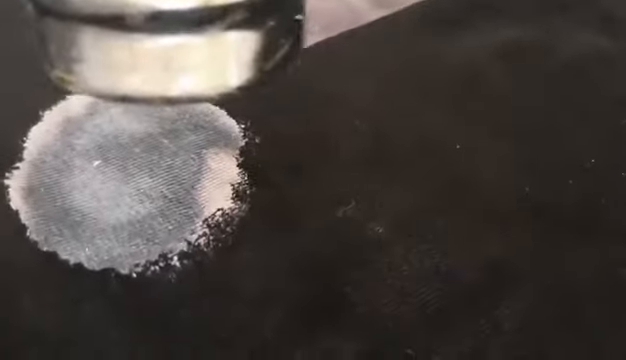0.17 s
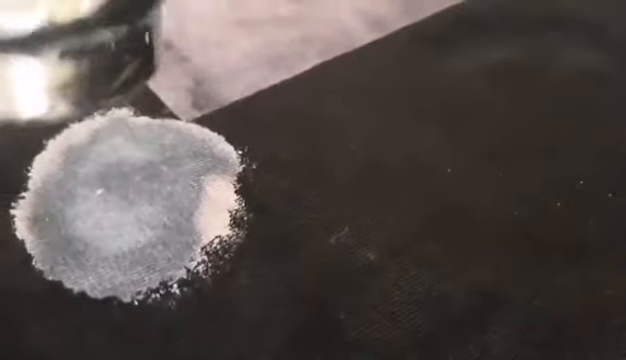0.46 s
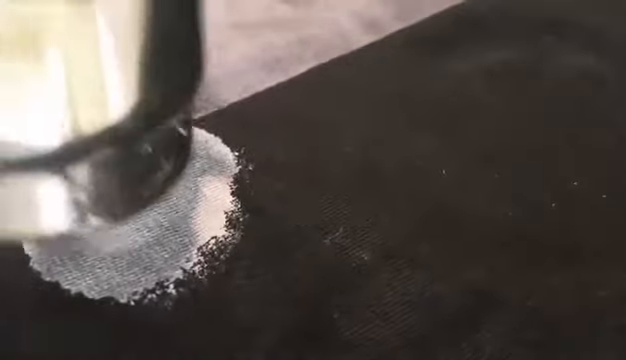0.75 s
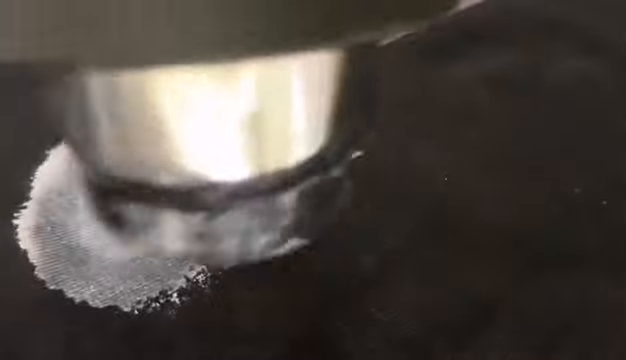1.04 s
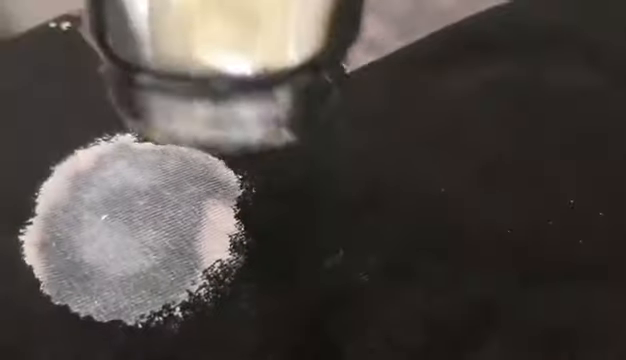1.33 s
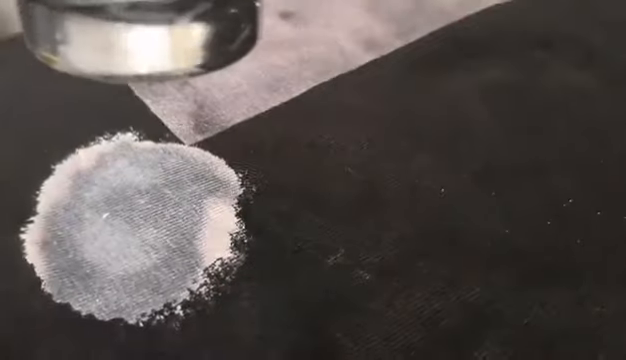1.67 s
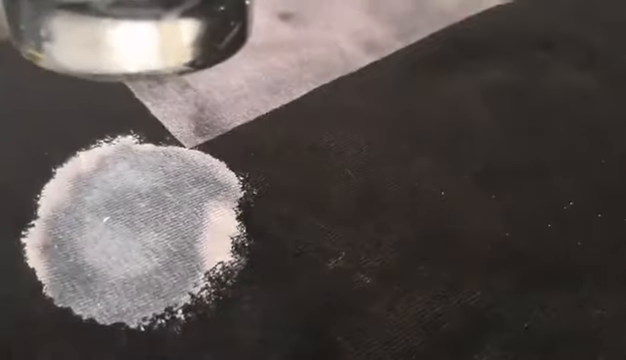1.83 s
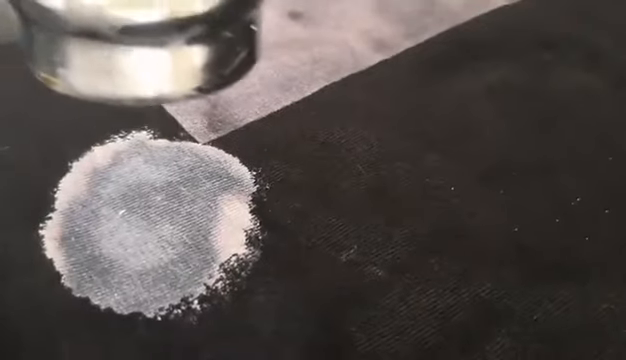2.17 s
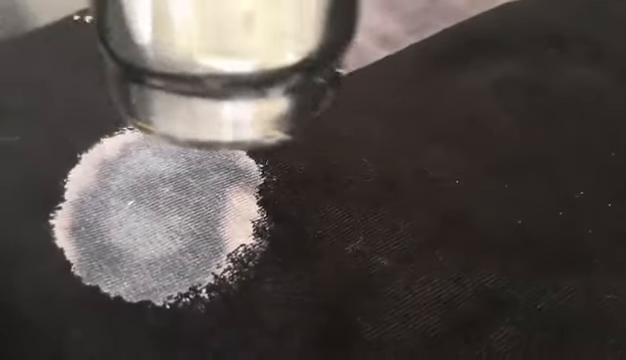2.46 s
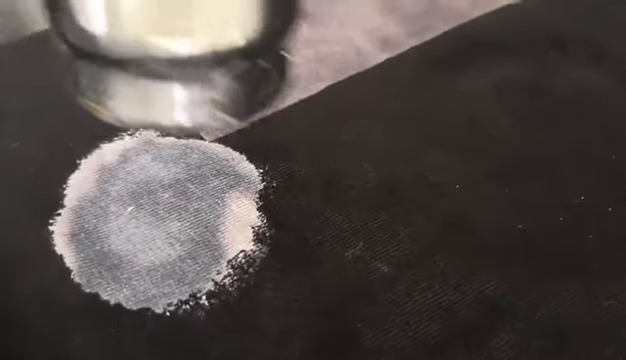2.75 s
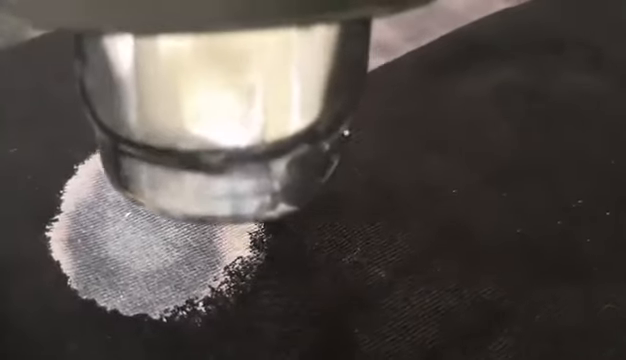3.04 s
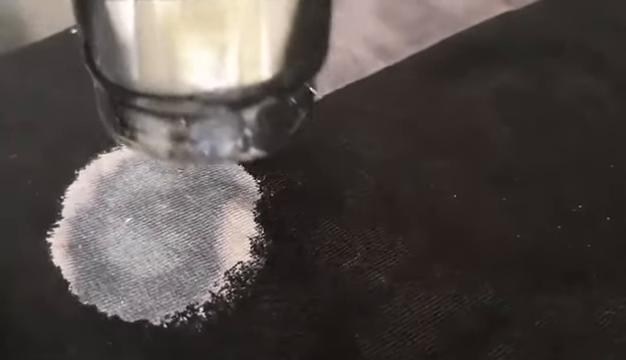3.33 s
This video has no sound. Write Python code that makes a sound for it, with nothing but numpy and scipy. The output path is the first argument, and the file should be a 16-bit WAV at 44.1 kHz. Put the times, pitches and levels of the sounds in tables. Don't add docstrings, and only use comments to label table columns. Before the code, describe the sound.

A handheld hot-air blower roars steadily close by, with a thin high motor whine inside.

```python
import sys
import numpy as np
from scipy import signal
from scipy.fft import rfft, irfft
from scipy.io import wavfile
from scipy.ndimage import uniform_filter1d

SR = 44100
rng = np.random.default_rng(int(sys.argv[2]) if len(sys.argv) > 2 else 0)


def voltage_ratio(decibels):
    exponent = np.asarray(decibels, float) / 20
    return 10 ** exponent


def to_wav(s):
    ch = np.atleast_2d(s).T
    pcm = np.round(np.clip(ch, -1, 1) * 32767)
    wavfile.write(sys.argv[1], SR, pcm.astype(np.int16))


N = 154350

# time_s, pitch_hz, level_db
PUFFS = [
    (0.5, 130, -47),
    (0.75, 240, -42),
    (0.8, 70, -50.5),
    (1.33, 80, -43.5),
    (1.64, 45, -51),
    (1.96, 45, -48),
    (2.27, 60, -52.5),
    (3.46, 150, -43),
]
# time_s, pitch_hz, level_db
BLADE_TONE = [(0.0, 3312, -34), (0.15, 3299, -36.5), (0.79, 3312, -37.5), (0.87, 3276, -36.5),
              (1.05, 3290, -34.5), (1.09, 3304, -39.5), (1.5, 3263, -39.5), (1.52, 3264, -33.5),
              (1.55, 3264, -38.5), (2.58, 3288, -37.5), (3.48, 3275, -42), (3.5, 3255, -34)]
# shaft_order, left_db, right_db, left_lead_rad
SHAFT_ORDERS = [(1, -18.5, -19.5, 0.15), (4, -2.5, -12, 3.2), (5, -3, -6.5, .8), (6, -15, -16.5, 2.4),
                (12, 0, -3, 5.44), (20, -19.5, -18, 1.4)]
# pitch_hz, level_db_per_hz
JET_HISS = [(400, -31.5), (1000, -10.5), (2100, -8), (3000, -10.5), (4500, -15.5), (6000, -16.5),
            (7500, -19)]
# time_s, flow_db, jet_level_db at both ports
SWEEP = [(0.0, -30, 0.5), (0.13, -31.5, 2.5), (0.53, -29.5, -0.5), (0.8, -30, 0), (1.2, -31, -4),
         (1.6, -31, -4), (2.0, -30.5, -4), (2.5, -31, 0), (2.8, -30, -1.5), (3.2, -31, -4), (3.5, -30, -5)]
# pitch_hz, level_db_per_hz
LEFT_RUSH = [(25, -21), (250, -13.5), (500, -9), (1000, -3), (2600, -2), (3900, -6), (5000, -12.5),
             (7500, -14)]
# pitch_hz, level_db_per_hz
RIGHT_RUSH = [(25, -22), (250, -13.5), (900, -10), (1600, -11), (2600, -2.5), (3900, -9.5), (4400, -22),
              (7500, -15.5)]
# pitch_hz, likeness_0_to_1
LIKENESS = [(200, 1), (350, 0.74), (1500, 0.32), (1800, 0.95), (2380, 0.92), (2750, 0.33), (3600, .8),
            (4200, 0)]
# pitch_hz, left_lead_rad
LEFT_LEAD = [(200, 0.02), (400, 2.39), (900, 2.87), (2350, 3.34), (2700, 4.44), (3000, 5.6), (3600, 5.9),
             (4200, 7.4)]
# pitch_hz, width_hz, left_db, right_db
RESONANCES = [(737, 132, -1, -12.5), (1081, 220, 0, -15.5), (1220, 100, -9, -14.5), (1540, 180, -3.5, -20),
              (1845, 280, 2, 1.5), (2190, 470, -3.5, -5.5), (2710, 290, -8.5, -8.5), (3780, 440, -4.5, -11),
              (4550, 510, -11, -33), (5550, 370, -14.5, -26)]
# pitch_hz, width_hz, left_db, right_db
DIPS = [(845, 59, -5, -0.5), (950, 58, 2, -2.5), (1751, 67, -5.5, 0.5), (2028.3, 65, 3.5, -8),
        (2310, 61, -1.5, -1.5), (3470, 100, -2, -3), (4080, 110, -5, -3), (5000, 440, -0.5, -6)]
# pitch_hz, extra_left_lead_rad, extra_right_db
TURNED_AWAY = [(1000, -0.5, 0), (1510, 0.4, -4), (1850, 0.95, -5), (2100, 0.4, -8.5), (2540, 0.7, 0),
               (2940, 0.35, 1.5), (3640, 1.1, 2.5), (4050, 2.5, 3.5)]
# time_s, share_0_to_1
TURN_SHARE = [(0.0, 0.73), (0.6, 0.92), (0.9, .4), (1.2, 0.06), (1.6, 0.23), (2.0, 0.05), (2.8, 0.06),
              (3.5, 0.01)]
# pitch_hz, edge_db against neighbouring bands
MUTE_EDGE = [(200, -21.5), (600, -13.5), (1500, -13.5), (2000, -11), (2400, -11), (3300, -9), (4500, -12.5),
             (7500, -15.5)]
# time_s, edge_rise_db
MUTE_RISE = [(0.0, 1.7), (0.2, 1.5), (0.55, 0.5), (0.8, 2.5), (1.05, 0.3), (1.2, 4), (1.33, 0), (1.46, 2.5),
             (1.7, 0.3), (2.03, 2.5), (2.25, 2.5), (2.38, 1.5), (2.54, 5), (2.65, 1.5), (2.92, 0.4),
             (3.15, 2.5), (3.32, 2.5), (3.5, 1)]


def curve(table, col):
    table = np.array(table, float)
    return np.interp(np.arange(N) / SR, table[:, 0], table[:, col])


def shape(table, hz, col=1):
    table = np.array(table, float)
    return np.interp(np.log(hz), np.log(table[:, 0]), table[:, col])


def walk(rate_hz):
    hold = int(SR / rate_hz)
    steps = np.repeat(rng.standard_normal(N // hold + 1), hold)
    smooth = uniform_filter1d(uniform_filter1d(steps, hold), hold)
    return 1.3 * smooth[:N]


def flutter(spectra, hz, slow_db, quick_db):
    out = 0
    place = 3 * np.log2(hz / 25)
    for band in range(26):
        share = np.clip(1 - abs(place - band), 0, 1)
        wander_db = slow_db * walk(2.39) + quick_db * walk(14)
        out = out + irfft(spectra * share, N) * voltage_ratio(wander_db)
    return out


def peak(hz, centre_hz, width_hz):
    return 1 / (1 + (2 * (hz - centre_hz) / width_hz) ** 2)


def puffs():
    t = np.arange(N) / SR
    puff_s = 0.021
    out = 0
    for start, hz, db in PUFFS:
        swell = np.exp(-((t - start) / puff_s) ** 2 / 2)
        out = out + voltage_ratio(db) * swell * np.sin(2 * np.pi * hz * (t - start))
    return out


def motor():
    blades, mains_hz, mains_db, sideband_db = 12, 100.4, -64, -48.5
    shaft_hz = curve(BLADE_TONE, 1) / blades * (1 + 0.00089 * walk(25))
    turn = 2 * np.pi * np.cumsum(shaft_hz) / SR
    buzz = 2 * np.pi * mains_hz * np.arange(N) / SR
    out = voltage_ratio(mains_db + 2.3 * walk(6)) * np.sin(buzz) * np.ones((2, 1))
    for order, left_db, right_db, lead in SHAFT_ORDERS:
        size = voltage_ratio(curve(BLADE_TONE, 2) + 3 + 2.7 * walk(7.9))
        left = voltage_ratio(left_db) * np.sin(round(order) * turn)
        right = voltage_ratio(right_db) * np.sin(round(order) * turn - lead)
        out = out + size * np.array([left, right])
    out[1] += voltage_ratio(sideband_db + 1.5 * walk(5)) * 2 * np.sin(5 * turn) * np.cos(buzz)
    return out


def jet(hz):
    port_db = [[0], [-9]]
    noise = rfft(rng.standard_normal((2, N))) * voltage_ratio(shape(JET_HISS, hz)) * voltage_ratio(port_db)
    return flutter(noise, hz, slow_db=0.8, quick_db=2.5) * voltage_ratio(curve(SWEEP, 2))


def rush(hz):
    flow, own_flow, ringing = rfft(rng.standard_normal((3, N)))
    like = np.clip(shape(LIKENESS, hz), 0, 1)
    late = np.exp(-1j * shape(LEFT_LEAD, hz))
    ring_power, dip_db = 0, 0
    for centre, width, left_db, right_db in RESONANCES:
        ring_power = ring_power + (voltage_ratio([[left_db], [right_db]]) * peak(hz, centre, width)) ** 2
    for centre, width, left_db, right_db in DIPS:
        dip_db = dip_db + np.array([[left_db], [right_db]]) * peak(hz, centre, width)

    left = voltage_ratio(shape(LEFT_RUSH, hz)) * flow + 0j
    right = voltage_ratio(shape(RIGHT_RUSH, hz)) * (like * flow * late + np.sqrt(1 - like ** 2) * own_flow)
    ring = np.sqrt(ring_power) * ringing * np.array([np.ones_like(late), late])
    left, right = voltage_ratio(dip_db) * (np.array([left, right]) + ring)

    turned = right * np.exp(-1j * shape(TURNED_AWAY, hz)) * voltage_ratio(shape(TURNED_AWAY, hz, col=2))
    left, right, turned = flutter(np.array([left, right, turned]), hz, slow_db=0.62, quick_db=1.0)
    share = np.clip(curve(TURN_SHARE, 1), 0, 1)
    return np.array([left, (1 - share) * right + share * turned])


def scene():
    hz = np.maximum(np.arange(N // 2 + 1) * SR / N, 10)
    flow_gain = voltage_ratio(curve(SWEEP, 1) + 7.5 + 9.5)
    return (rush(hz) + jet(hz)) * flow_gain + motor() + puffs()


def mute_faint(pair, edge_db, own):
    hz, t, z = signal.stft(pair, SR, "cosine", nperseg=2048)
    power = uniform_filter1d(abs(z[:, :1024]) ** 2, size=2, axis=2)
    band = abs(power.reshape(2, 256, 4, -1).mean(axis=2)) + 1e-20
    around = uniform_filter1d(band if own else band.max(axis=0), size=7, axis=-2)
    wander = uniform_filter1d(rng.standard_normal(band.shape), size=2, axis=2) * 1.44
    wander_db = 2.5 * wander
    rise_db = curve(MUTE_RISE, 1)[np.minimum(t * SR, N - 1).astype(int)]
    edge = edge_db(hz[2:1024:4, None]) + rise_db
    keep = np.clip(10 * np.log10(band / abs(around)) - edge - wander_db, 0, 1)
    keep[:, :2] = 1
    gain = np.pad(np.repeat(keep, 4, axis=1), ((0, 0), (0, 1), (0, 0)))
    return signal.istft(z * gain, SR, "cosine", nperseg=2048)[1][:, :N]


def band_limit(x):
    return signal.sosfilt(signal.butter(12, 8830, fs=SR, output="sos"), x)


def record(dry):
    top_cut = signal.ellip(12, 0.3, 90, 7490, fs=SR, output="sos")
    cut = signal.sosfilt(top_cut, dry)
    left, right = mute_faint(cut, lambda hz: -9.5, own=True)
    mid_side = np.array([left + right, left - right]) / 2
    mid, side = mute_faint(mid_side, lambda hz: shape(MUTE_EDGE, hz), own=False)
    return band_limit(np.array([mid + side, mid - side]))


dry = scene()
out = record(dry)
to_wav(out)
```